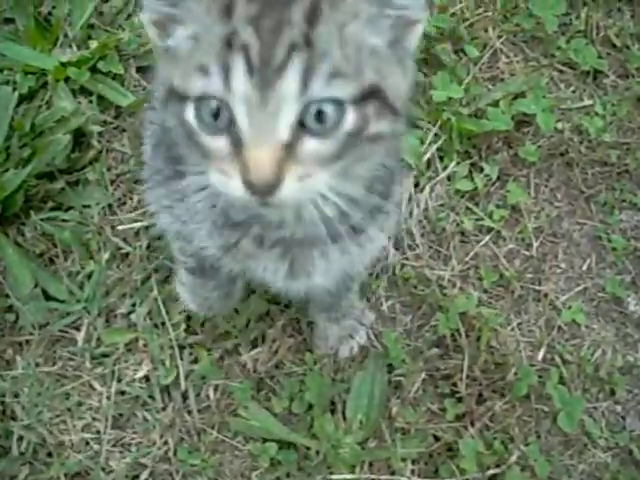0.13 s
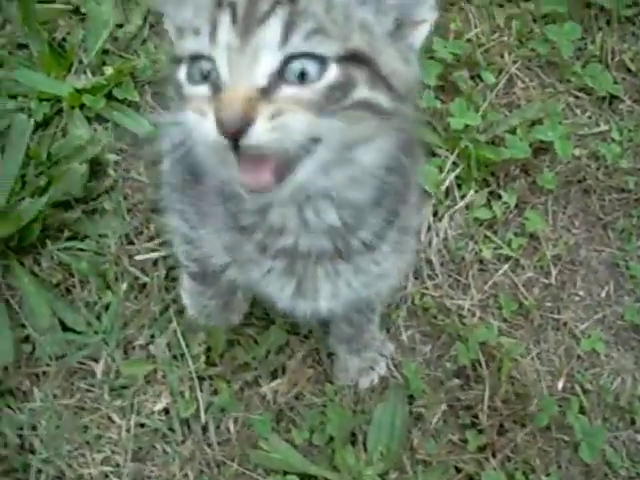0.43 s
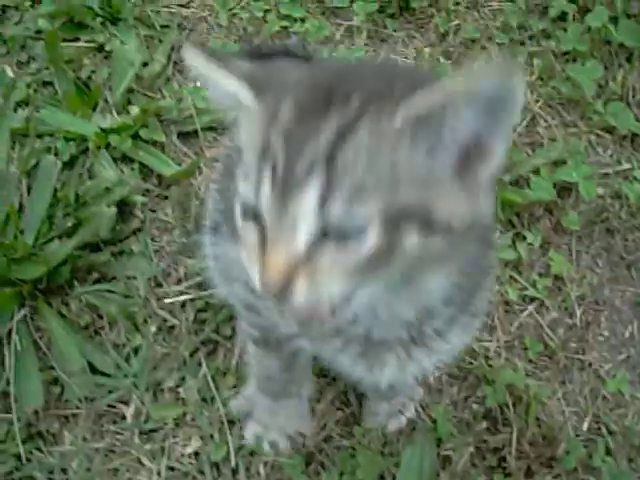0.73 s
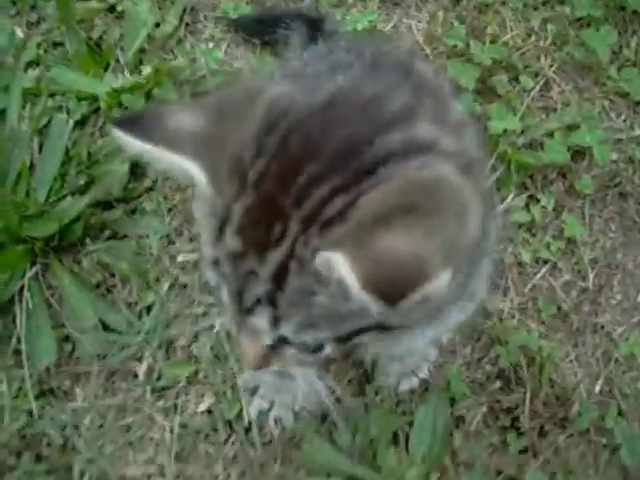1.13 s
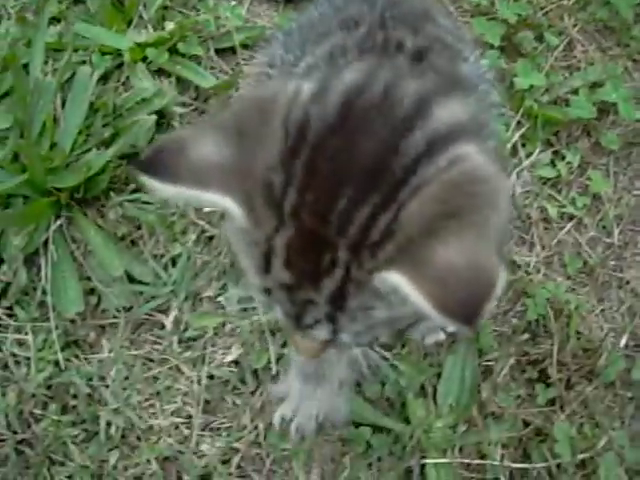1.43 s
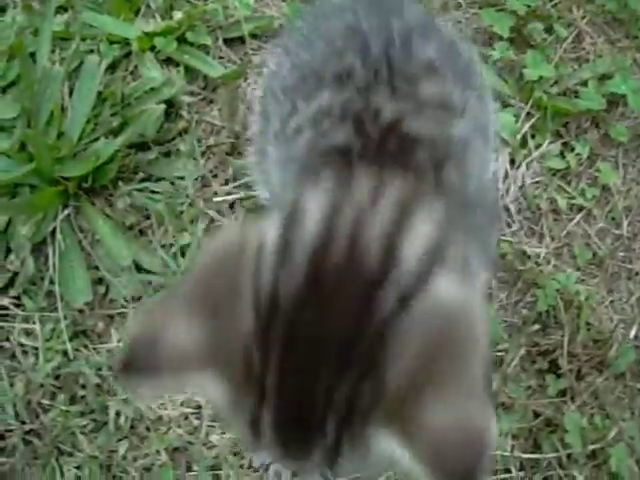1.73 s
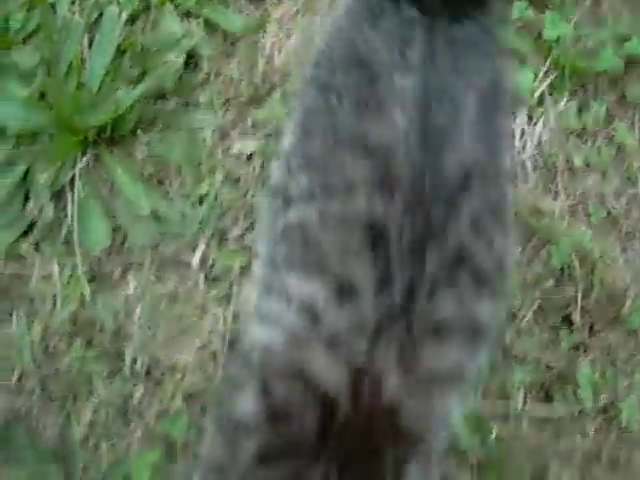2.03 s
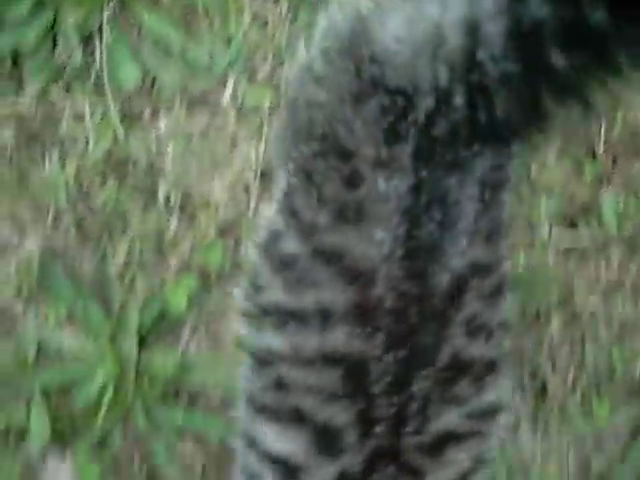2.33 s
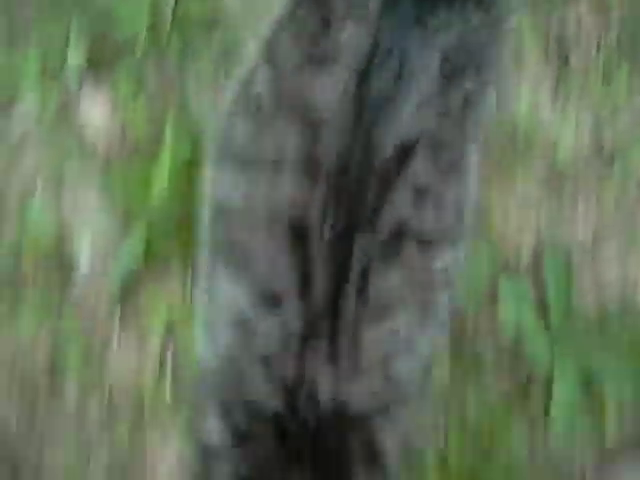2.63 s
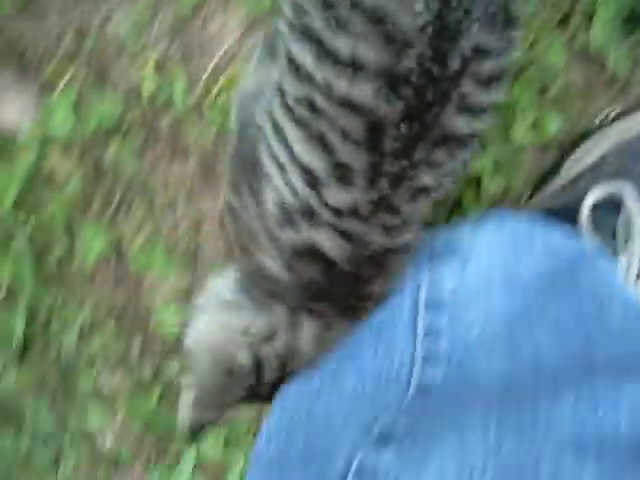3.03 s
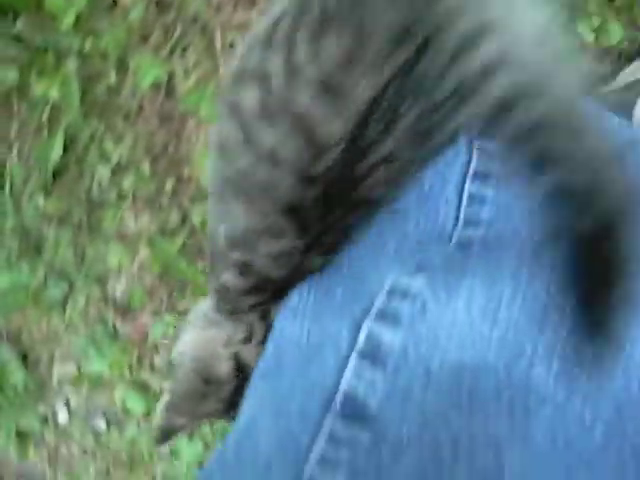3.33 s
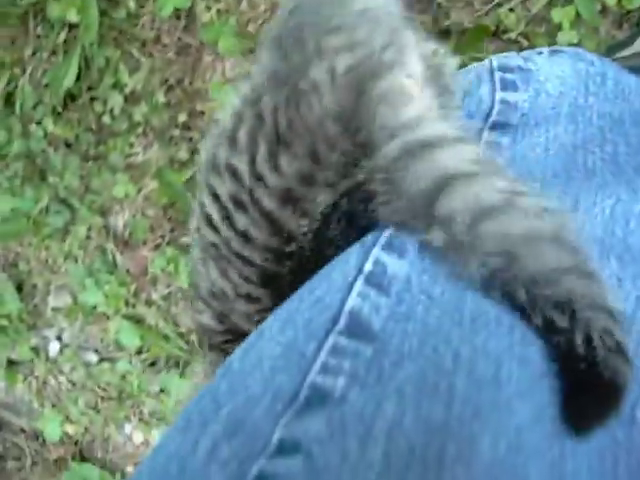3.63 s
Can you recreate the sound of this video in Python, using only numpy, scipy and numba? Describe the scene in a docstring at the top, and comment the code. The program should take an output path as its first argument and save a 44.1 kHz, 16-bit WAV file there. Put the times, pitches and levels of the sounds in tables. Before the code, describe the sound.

A kitten close to the microphone gives one thin, falling, slightly cracking meow from about 0.4 to 1.2 seconds, with small mouth clicks before and after. A faint outdoor wash and low distant hum continue throughout. Very faint high chirps come between 1.6 and 2.4 seconds. From 3 seconds fur brushes softly against a trouser leg, and a finger knocks sharply on the microphone at 3.7 seconds.

```python
"""A faint outdoor wash and a low distant hum are heard first; then a kitten on a lawn, close to a
hand-held camera, gives one thin, falling meow, its mouth clicking as it opens and closes.
The voice is a source and a filter: vocal-fold pulses, which crack and creak on the way, excite the
resonances of mouth, throat and nose. Faint high chirps follow from far off. Late on, the kitten
brushes against a trouser leg, and a finger knocks the camera body into brief vibration."""
import sys
import numpy as np
from scipy.fft import rfft, irfft
from scipy.io import wavfile
from scipy.ndimage import uniform_filter1d
from numba import njit

SR = 44100
rng = np.random.default_rng(int(sys.argv[2]) if len(sys.argv) > 2 else 0)


def persist_wave(psi):
    """Save psi, clipped to +-1, as 16-bit WAV."""
    counts = np.round(np.clip(psi, -1, 1) * 32767).astype(np.int16)
    wavfile.write(sys.argv[1], SR, np.atleast_2d(counts).T)


N = 166257
T = np.arange(N) / SR

WASH_SPECTRUM = [(12, -20.5), (20, -1), (54, -4.5), (86, -2), (102, -5), (117, -7.5), (139, -11), (159, -8),
                 (190, -10.5), (226, -10.5), (402, -15.5), (490, -13), (625, -16), (698, -14), (930, -13),
                 (2400, -22), (3900, -24), (5070, -53), (8580, -120)]  # outdoor wash: f/Hz, relative density/dB
WASH_LEVEL = [(0, -50.5), (.5, -50.5), (1.7, -50), (2.4, -50), (3.0, -50.5), (3.77, -49)]  # t/s, level/dB
HUM_ENVELOPE = [(0, -59.5), (.8, -55), (1.5, -55.5), (2.3, -63), (3.1, -59), (3.77, -64)]  # distant hum: t/s, level/dB
FAR_CHIRPS = [(1.636, 0.13, -66), (1.78, .1, -74), (2.074, 0.096, -67.5), (2.196, 0.095, -66.5),
              (2.347, 0.094, -66.5)]  # centre t/s, duration/s, level/dB
FUR_SPECTRUM = [(200, -19), (800, 5), (1500, -8.5), (2500, -3.5), (3600, 1), (4300, -13)]  # fur on cloth: f/Hz, relative density/dB
FUR_LEVEL = [(2.6, -92), (3.0, -60.5), (3.3, -54.5), (3.45, -56.5), (3.77, -54.5)]  # t/s, level/dB
CAMERA_MODES = [(380, -19.5, 0.068), (900, -15, 0.0014), (1450, -13.5, 0.004), (2300, -7.5, 0.0088),
                (3280, -8, 0.0017), (3470, 4.5, 0.0078)]  # modes of the camera body: f/Hz, relative level/dB, T60/s
MOUTH_CLICKS = [(.3072, -32.5, 1150, 2000, 2350), (0.341, -26, 980, 1850, 2200),
                (1.2514, -32.5, 1120, 1700, 2600), (1.2571, -22, 1100, 1620, 2680)]  # t/s, peak level/dB, mouth modes f1/Hz, f2/Hz, f3/Hz
CLICK_DECAYS = [(-0.5, 0.013), (3, 0.0085), (4.5, 0.0083)]  # those three modes: relative level/dB, T60/s

# the two main formants of the moving mouth: t/s, lower f/Hz, upper f/Hz, gain of the upper/dB
MOUTH_FORMANTS = [(.457, 1970, 2450, -2), (.54, 2220, 2660, -0.5), (.62, 2100, 2530, -2.5),
                  (.675, 2480, 2580, -0.5), (.70, 2400, 2916, 4), (.745, 2250, 2922, 1.5),
                  (.8, 2200, 2630, -1), (.92, 2190, 2396, -0.5), (1.02, 1960, 2423, -2),
                  (1.12, 1970, 2390, -1.5), (1.24, 1750, 2150, -2.5)]
TREBLE_FORMANTS = [(3250, 380, -8.5), (3890, 130, -15.5), (4800, 660, -16.5)]  # higher mouth resonances: f/Hz, bandwidth/Hz, gain/dB
TREBLE_GAIN = [(.46, -4.5), (.55, 1), (.6, -8.5), (.67, -6), (.71, 7.5), (.745, 2), (.78, -3), (.92, -12),
               (1.24, -10.5)]  # t/s, gain/dB
THROAT_FORMANT = [(1547, 260, 0)]  # heard at any mouth opening: f/Hz, bandwidth/Hz, gain/dB
THROAT_GAIN = [(.457, -42), (.5, -42), (.56, -43.5), (.64, -38.5), (.70, -41), (.76, -39.5), (.85, -39),
               (.92, -41), (1.02, -39), (1.12, -43.5), (1.24, -42.5)]  # t/s, gain/dB
NOSE_FORMANTS = [(520, 250, -5.5), (920, 380, -3)]  # f/Hz, bandwidth/Hz, gain/dB
NOSE_GAIN = [(.44, -28.5), (.465, -34), (.5, -38.5), (.55, -46.5), (.72, -42), (.85, -47.5), (1.02, -43.5),
             (1.24, -46)]  # greatest before the mouth opens: t/s, gain/dB
FOLD_CREAKS = [(.459, .002, 400, -44), (.7785, .034, 210, -37), (.8225, .003, 300, -39),
               (.8705, .007, 330, -35), (.9825, .007, 380, -38)]  # onset t/s, duration/s, slap rate/Hz, level/dB
FOLD_PITCH = [(.436, 1041), (.445, 1092), (.458, 924.5), (.465, 840), (.475, 777), (.5, 681), (.54, 602.6),
              (.6, 547.5), (.64, 518.7), (.668, 514.9), (.69, 484.7), (.74, 487.6), (.8, 498.8),
              (.835, 520), (.865, 523.6), (.893, 493), (.94, 500.5), (.975, 511.6), (1.012, 548),
              (1.04, 531.5), (1.08, 520), (1.14, 478), (1.2, 433), (1.24, 406.5)]  # fundamental of the meow: t/s, f/Hz
VOCAL_EFFORT = [(.44, -43.5), (.47, -50.5), (.51, -48.5), (.55, -43.5), (.6, -38.5), (.66, -38), (.69, -39),
                (.725, -31.5), (.765, -41.5), (.8, -44), (.835, -38), (.857, -43), (.92, -41.5),
                (.975, -44), (1.0, -45), (1.04, -46.5), (1.11, -49.5), (1.24, -55)]  # sound from the mouth: t/s, level/dB
VOICE_CRACKS = [(0.462, 0.0044, 4.5, 0.018), (0.55, 0.0079, -0.5, 0.023), (.677, 0.014, 6, 0.012),
                (0.819, .011, 8.5, .1), (0.874, 0.00907, 14.5, 0.11), (.986, 0.0084, 6.5, 0.017),
                (1.021, 0.0071, 9, 0.12)]  # centre t/s, duration/s, boost/dB, fractional rise in pitch
VOICED_SPANS = [(.437, .443), (0.4577, 1.238)]  # a tiny squeak, then the meow: start t/s, end t/s

CAMERA_RATE_HZ = 8000


def undb(db):
    """Amplitude ratio of a level in decibels."""
    return 10 ** (np.asarray(db) / 20)


def curve(table, axis=1):
    """Linear interpolation in time of one column of a table."""
    rows = np.array(table)
    return np.interp(T, rows[:, 0], rows[:, axis])


def unit(x):
    """Normalisation to rms 1."""
    return x / np.sqrt(np.mean(x ** 2))


def swell(centre, length):
    """Gaussian envelope, `length` seconds wide at 1/e of its peak."""
    return np.exp(-(2 * (T - centre) / length) ** 2)


def drift(rate_hz):
    """Smoothed random fluctuation of rms 1."""
    hold = max(int(SR / rate_hz), 1)
    steps = rng.standard_normal(N)[np.arange(N) // hold]
    return unit(uniform_filter1d(uniform_filter1d(steps, hold), hold))


def noise(spectrum):
    """Spectral shaping of white noise, band-limited to half the camera's rate, at rms 1."""
    hz, db = np.array(spectrum).T
    f = np.maximum(np.fft.rfftfreq(N, 1 / SR), 1)
    gain = undb(np.interp(np.log(f), np.log(hz), db)) * (f < CAMERA_RATE_HZ / 2)
    return unit(irfft(rfft(rng.standard_normal(N)) * gain, N))


@njit
def resonator(x, hz, width):
    """Second-order resonance with unit gain at its moving centre frequency."""
    y, band_state, low_state = np.empty(len(x)), 0., 0.
    for i in range(len(x)):
        tuning, damping = np.tan(np.pi * hz[i] / SR), width / hz[i]
        band = (band_state + tuning * (x[i] + 1e-18 - low_state)) / (1 + tuning * (tuning + damping))
        band_state = 2 * band - band_state
        low_state += 2 * tuning * band
        y[i] = damping * band
    return y


def bank(x, resonances):
    """Stationary resonators in parallel, summed with alternating sign."""
    return sum((-1) ** k * undb(db) * resonator(x, np.full(N, float(hz)), float(width))
               for k, (hz, width, db) in enumerate(resonances))


def ring(start, modes):
    """Free vibration after an impulse: a sum of exponentially damped modes, at peak 1."""
    age = np.maximum(T - start, 0)
    y = sum((-1) ** k * undb(db) * np.sin(2 * np.pi * hz * age) * np.exp(-np.log(1000) * age / t60)
            for k, (hz, db, t60) in enumerate(modes))
    return y / np.abs(y).max()


def outdoor_wash():
    """Distant sounds merge into a continuous spectrum whose level flickers slightly."""
    return noise(WASH_SPECTRUM) * undb(curve(WASH_LEVEL) + 0.5 * drift(11))


def distant_hum(hz=114.5, waver=0.005):
    """A fundamental and its octave, slowly modulated in pitch and level, like a far engine."""
    phase = 2 * np.pi * np.cumsum(hz * (1 + waver * drift(9))) / SR
    octave = undb(-11 + 5 * drift(10)) * np.sin(2 * phase)
    return np.sqrt(2) * (np.sin(phase) + octave) * undb(curve(HUM_ENVELOPE) + 0.77 * drift(7))


def far_chirps(hz=4020, width_hz=140):
    """Narrow-band noise has a pitch: its swells are heard as thin chirps, perhaps an insect."""
    band = [(hz, width_hz, 0)]
    envelope = sum(undb(db) * swell(centre, length) for centre, length, db in FAR_CHIRPS)
    return unit(bank(bank(rng.standard_normal(N), band), band)) * envelope


def fur_brush():
    """Sliding friction of fur on cloth radiates an uneven hiss."""
    return noise(FUR_SPECTRUM) * undb(curve(FUR_LEVEL) + 1.8 * drift(30))


def camera_knock(start_s=3.6998, peak_db=-12.5):
    """The impact of a finger excites the damped modes of the camera body."""
    return undb(peak_db) * ring(start_s, CAMERA_MODES)


def mouth_clicks():
    """Wet lips and tongue excite the mouth cavity impulsively: three modes ring under a high tick."""
    tick = (3320, 2, 0.005)  # f/Hz, relative level/dB, T60/s
    out = np.zeros(N)
    for start, peak_db, *mode_hz in MOUTH_CLICKS:
        modes = [(hz, db, t60) for hz, (db, t60) in zip(mode_hz, CLICK_DECAYS)]
        out += undb(peak_db) * ring(start, modes + [tick])
    return out


def mouth_filter(x, lower_width_hz=407., upper_width_hz=328.):
    """Cavity resonance: two formants move with the mouth opening, below stationary treble ones."""
    lower = resonator(x, curve(MOUTH_FORMANTS, axis=1), lower_width_hz)
    upper = resonator(x, curve(MOUTH_FORMANTS, axis=2), upper_width_hz)
    treble = bank(x, TREBLE_FORMANTS) * undb(curve(TREBLE_GAIN))
    return lower - undb(curve(MOUTH_FORMANTS, axis=3)) * upper + treble


def creak(gap_scatter=0.36, scatter_db=1.5, throat_db=-11):
    """Aperiodic vibration: the folds slap slowly and unevenly, each slap ringing mouth and throat."""
    out = np.zeros(N)
    for start, length, rate, db in FOLD_CREAKS:
        gap_chance, level_chance = rng.standard_normal((16, 2)).T
        gaps = np.exp(gap_scatter * gap_chance) / rate
        delays = np.cumsum(gaps) - gaps[0]
        slaps = np.zeros(N)
        slaps[((start + delays) * SR).astype(int)] = undb(scatter_db * level_chance) * (delays < length)
        ringing = mouth_filter(slaps) - undb(throat_db) * bank(slaps, THROAT_FORMANT)
        out += unit(ringing) * np.sqrt(length * SR / N) * undb(db)  # level referred to its duration
    return out


def meow(jitter=0.0066, shimmer_db=1, rasp_db=-14, attack_s=0.0022, release_s=0.0024):
    """Source and filter: periodic fold pulses sound through mouth, throat and nose."""
    # in a crack the voice leaps in pitch, turns rough and usually swells
    cracking, boost_db, pitch_lift = np.zeros((3, N))
    for centre, length, db, rise in VOICE_CRACKS:
        crack = swell(centre, length)
        cracking += crack
        boost_db += db * crack
        pitch_lift += rise * crack
    hz = curve(FOLD_PITCH) * (1 + pitch_lift + jitter * drift(250))
    phase = 2 * np.pi * np.cumsum(hz) / SR
    pulses = unit(sum(np.cos(k * phase) for k in range(1, 12)))
    roughness = 1 + 0.4 * cracking * drift(498.7)
    rasp = undb(rasp_db) * (1 + np.cos(phase)) * rng.standard_normal(N)  # noise in step with the folds
    source = pulses * roughness + rasp
    # dividing by the running rms holds the level as harmonics cross the formants
    running_rms = np.sqrt(uniform_filter1d(mouth_filter(pulses) ** 2, size=900))
    mouth = mouth_filter(source) / running_rms * undb(curve(VOCAL_EFFORT) + boost_db)
    throat = bank(source, THROAT_FORMANT) * undb(curve(THROAT_GAIN))
    nose = bank(source, NOSE_FORMANTS) * undb(curve(NOSE_GAIN))
    voicing = sum(np.clip((T - start) / attack_s, 0, 1) * np.clip((end - T) / release_s + 1, 0, 1)
                  for start, end in VOICED_SPANS)
    return (mouth - throat - nose) * voicing * undb(shimmer_db * drift(69.6))


def scene():
    """Superposition of all sources at one microphone."""
    kitten = meow() + creak() + mouth_clicks()
    return (kitten + outdoor_wash() + distant_hum() + far_chirps() + fur_brush() + camera_knock())[None]


def record(dry):
    """Aliasing: the camera's low sampling rate mirrors the treble about half that rate; a low-pass follows."""
    alias_db, stop_db, pass_hz, stop_hz = -2.5, -66, 3900, 4700
    aliased = dry * (1 + 2 * undb(alias_db) * np.cos(2 * np.pi * CAMERA_RATE_HZ * T))
    f = np.fft.rfftfreq(N, 1 / SR)
    rolloff = np.clip((f - pass_hz) / (stop_hz - pass_hz), 0, 2)
    return irfft(rfft(aliased) * undb(stop_db * rolloff ** 2), N)


dry = scene()
out = record(dry)
persist_wave(out)
```